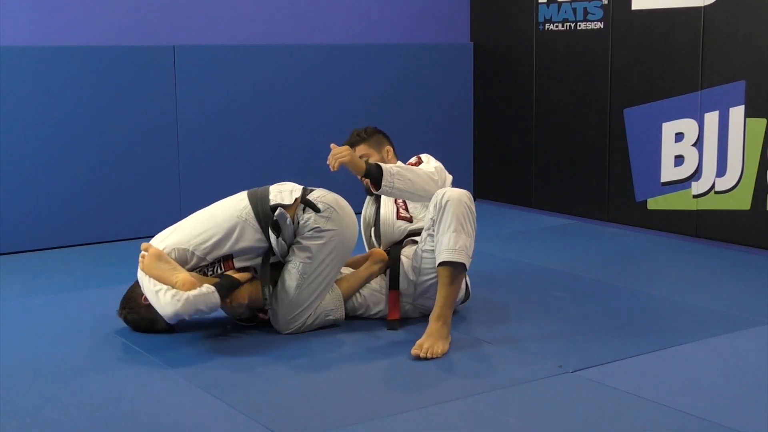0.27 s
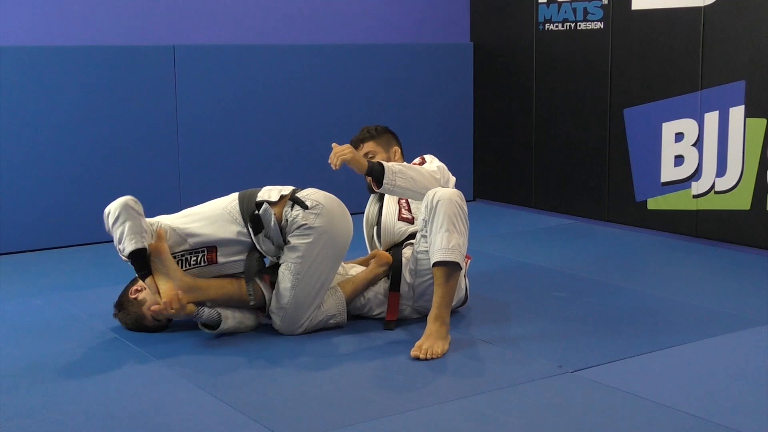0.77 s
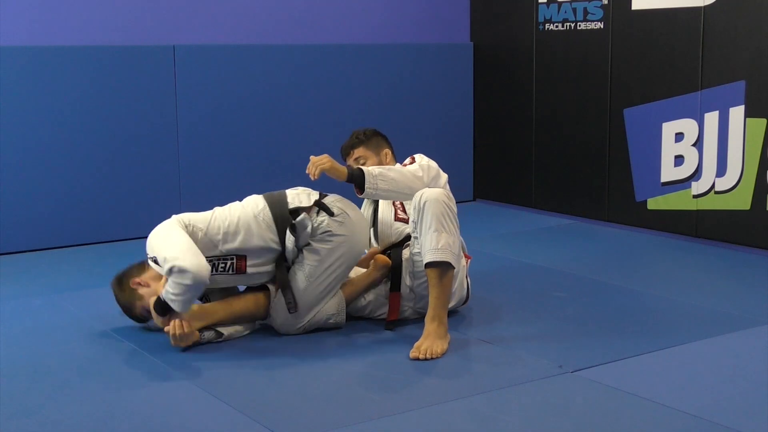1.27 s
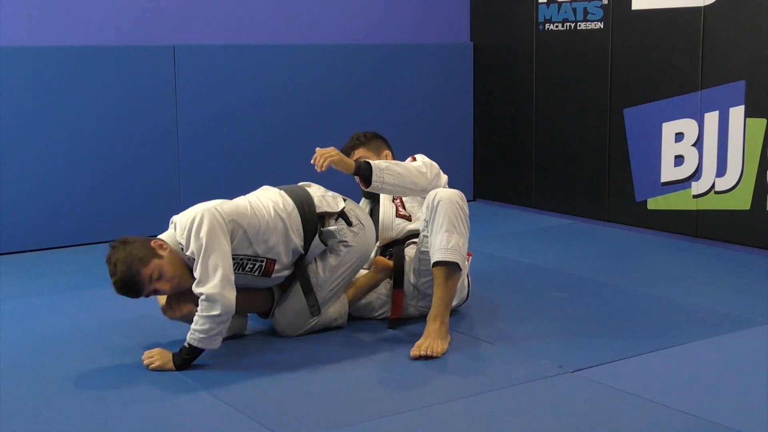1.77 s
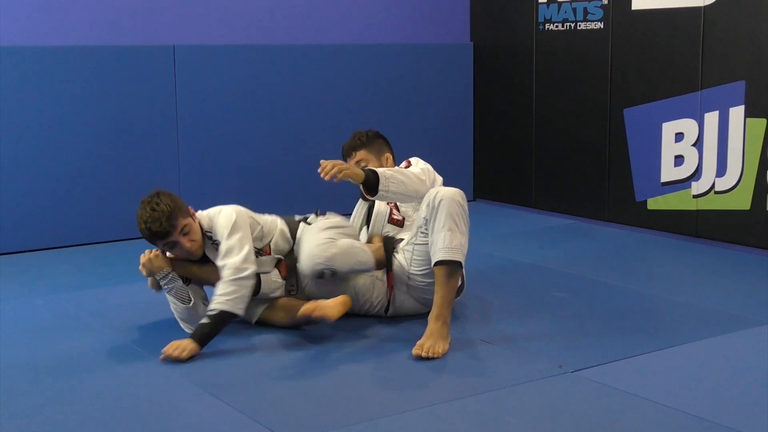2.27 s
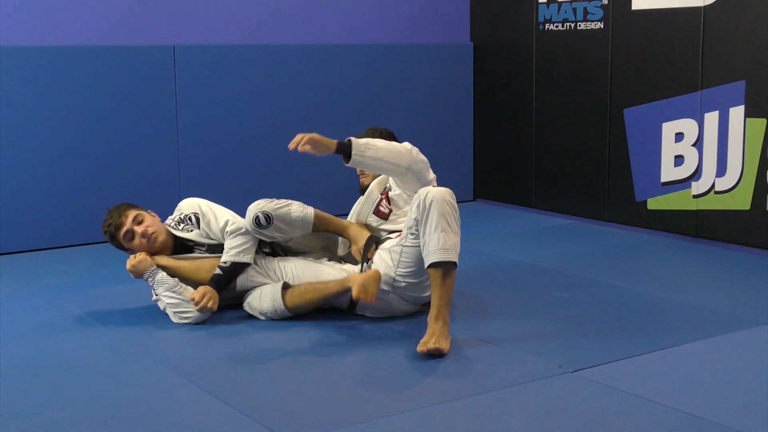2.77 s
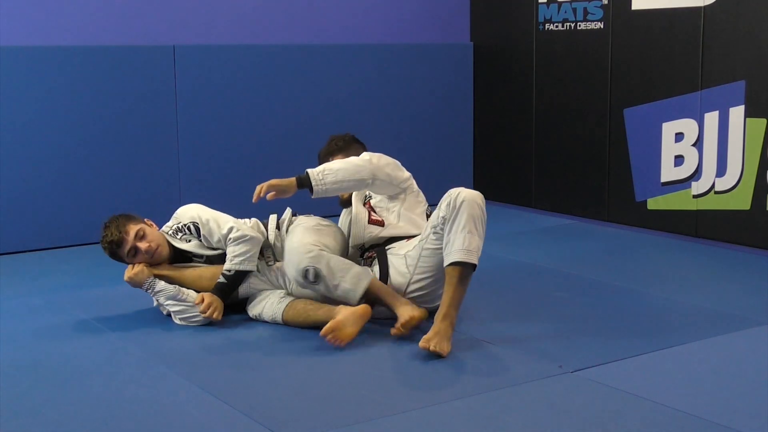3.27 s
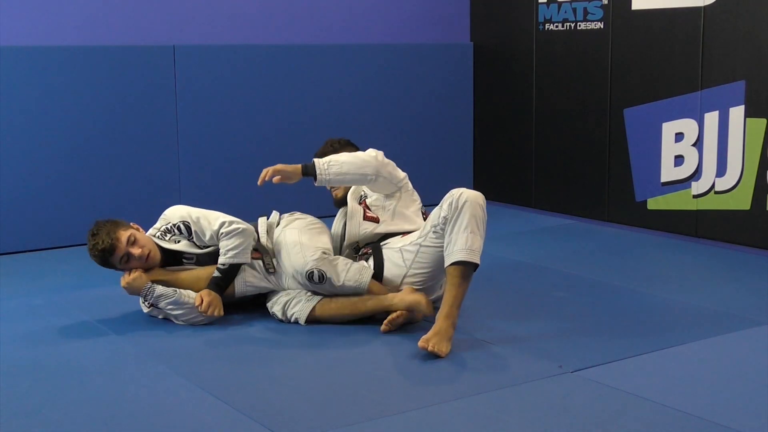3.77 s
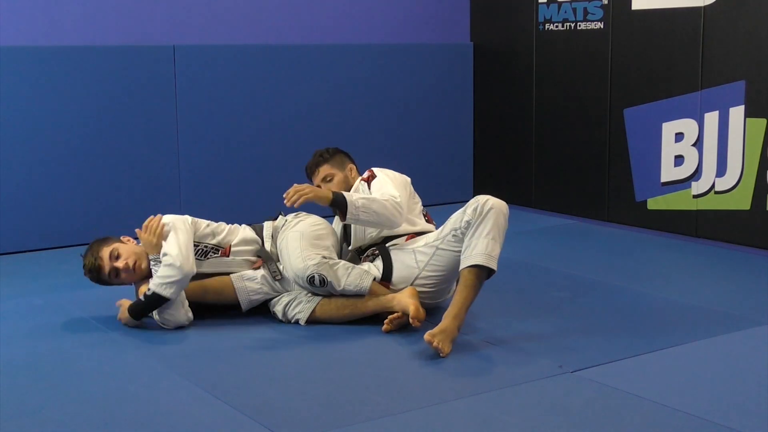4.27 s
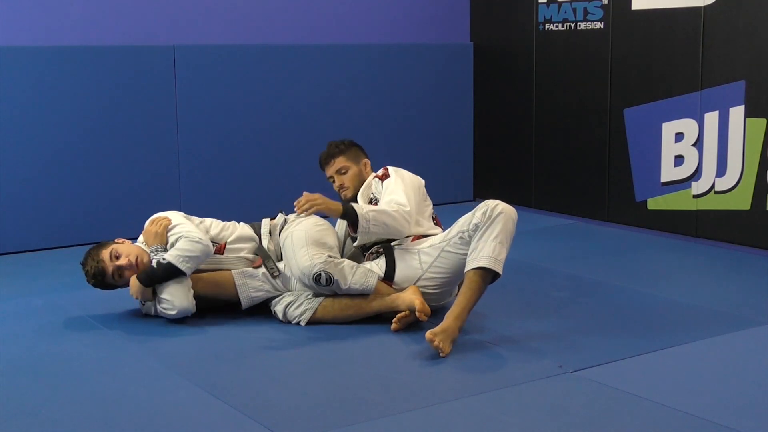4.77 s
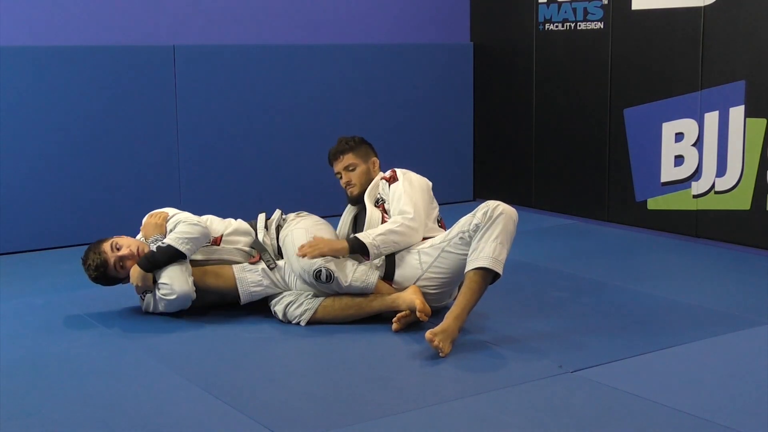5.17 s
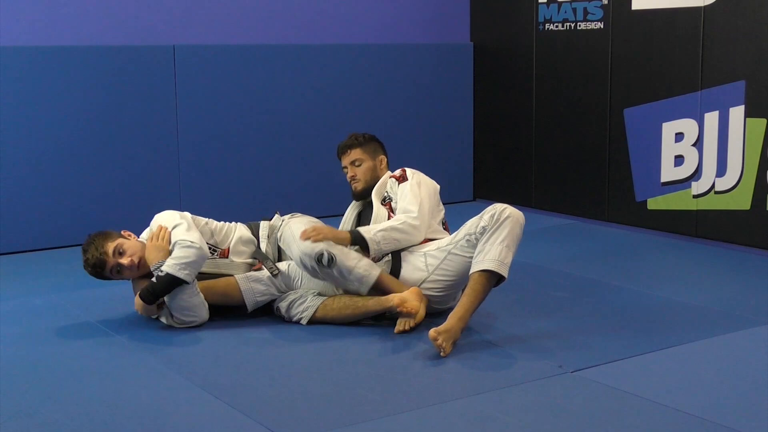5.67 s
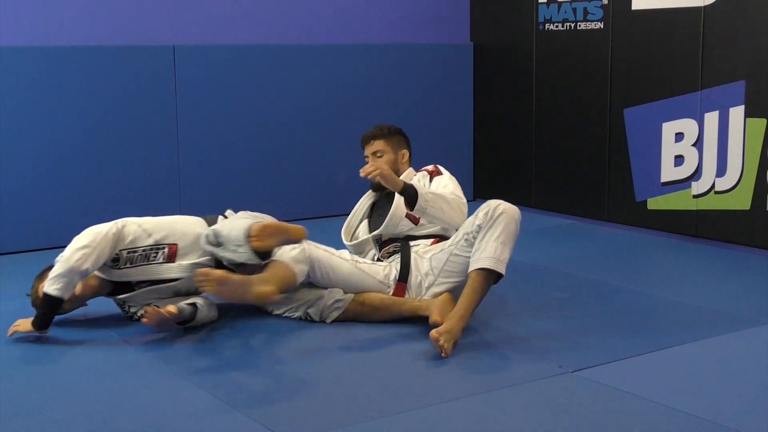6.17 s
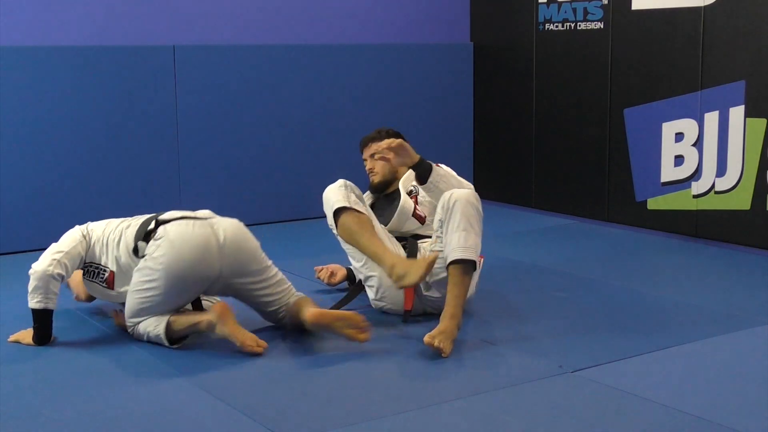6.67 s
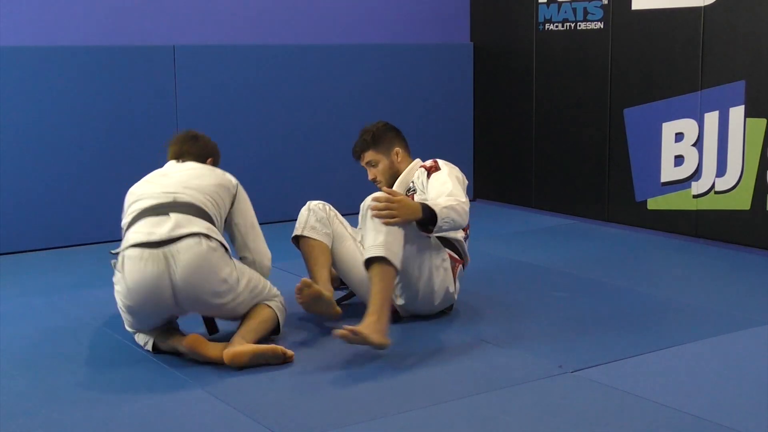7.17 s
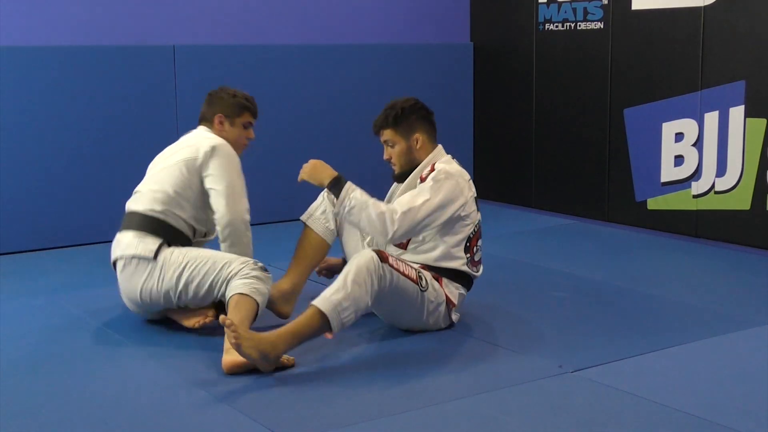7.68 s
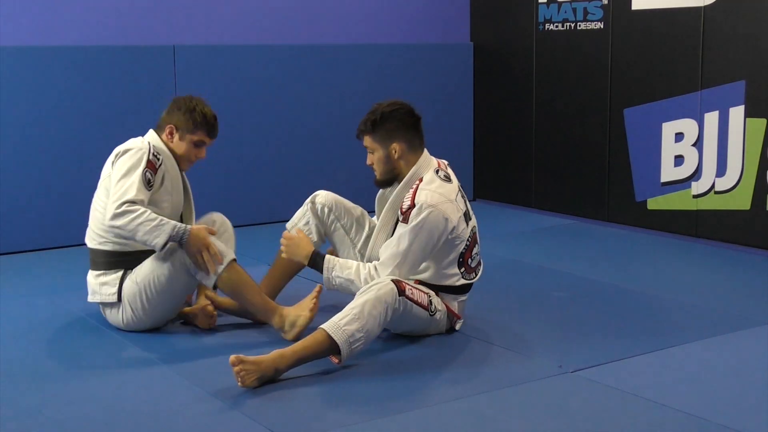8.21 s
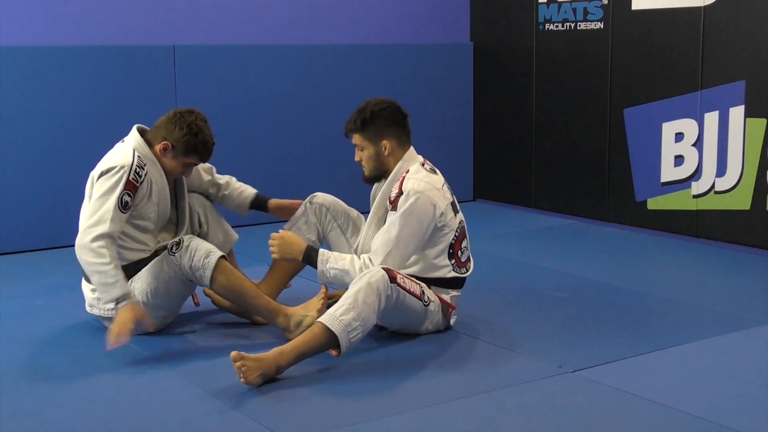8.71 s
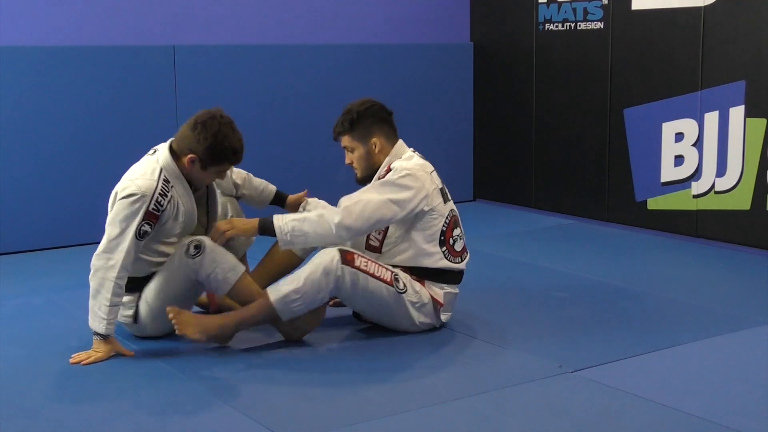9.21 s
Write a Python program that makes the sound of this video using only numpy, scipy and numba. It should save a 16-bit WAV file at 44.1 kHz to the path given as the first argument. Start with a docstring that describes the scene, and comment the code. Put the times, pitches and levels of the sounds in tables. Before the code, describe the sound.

Heavy cloth rustles and swishes as two people roll on a padded gym mat, with dull thuds of knees and limbs.

```python
"""Two people in heavy cotton suits roll on a foam mat in a padded gym, a few metres from a stereo mic.
Weave drags on weave, cloth and skin swish and squeak over the vinyl, weight shifts in the foam;
knees thud and a palm pats. The mat's echo hollows out the low middle; the room rings for
half a second over a faint ventilation hum."""
import sys
import numpy as np
from scipy import signal
from scipy.fft import rfft, irfft
from scipy.io import wavfile
from scipy.ndimage import uniform_filter1d
from numba import njit

SR = 44100
rng = np.random.default_rng(int(sys.argv[2]) if len(sys.argv) > 2 else 0)


def output_pcm(signal):
    """Save a mono or channel-first signal as 16-bit PCM at the path in sys.argv[1].

    Samples are clipped to [-1, 1] before scaling.
    """
    pcm = np.clip(np.atleast_2d(signal).T, -1, 1) * 32767
    wavfile.write(sys.argv[1], SR, np.round(pcm).astype(np.int16))


N = 416744
T = np.arange(N) / SR


def undb(db):
    return 10 ** (np.asarray(db) / 20)


def unit(x):
    """Scale to rms 1."""
    return x / np.sqrt(np.mean(x ** 2))


def colour(x, table, share=1, size=8192):
    """Minimum-phase filter through (Hz, dB) points; share scales the dB."""
    hz, db = np.transpose(table)
    bin_hz = np.arange(size // 2 + 1) * SR / size
    gain_db = share * np.interp(np.log(bin_hz + 1), np.log(hz + 1), db)
    cepstrum = irfft(gain_db * np.log(10) / 20)
    cepstrum[1:size // 2] *= 2
    cepstrum[size // 2 + 1:] = 0
    return signal.fftconvolve(x, irfft(np.exp(rfft(cepstrum))))[:len(x)]


@njit
def svf(x, hz, q):
    """State-variable band-pass with a moving centre, gain 1 there."""
    y = np.empty(len(x))
    mid, low, k = 0., 0., 1 / q
    for i in range(len(x)):
        g = np.tan(np.pi * hz[i] / SR)
        v = (mid + g * (x[i] - low)) / (1 + g * (g + k))
        mid, low = 2 * v - mid, low + 2 * g * v
        y[i] = k * v
    return y


def band(x, hz, q):
    return svf(x, np.full(len(x), float(hz)), float(q))


def walk(rate_hz):
    """Random levels held 1 / rate_hz seconds, smoothed twice."""
    hold = int(SR / rate_hz)
    steps = np.repeat(rng.standard_normal(N // hold + 1), hold)[:N]
    return uniform_filter1d(uniform_filter1d(steps, hold), hold)


def add(out, at_s, sound):
    i = int(at_s * SR)
    out[i:i + len(sound)] += sound[:len(out) - i]


def ventilation(hiss_db=-52.5):
    """Near-steady room hiss and a wavering low hum."""
    # Hiss spectrum. Each row: frequency in Hz, relative density in dB.
    hiss_shape = [(18, -37), (30, 1.5), (203, 3.5), (457, -15.5), (610, -12), (1110, -1), (1530, 3),
                  (5360, -9), (10300, -9), (15700, -13.5)]
    # Ventilation rumble. Each row: centre in Hz, width in Hz, level in dB.
    hum_bands = [(55.34, 6.9, -60.5), (124, 14.3, -60), (203, 19.3, -62)]
    hiss = unit(colour(rng.standard_normal(N), hiss_shape)) * undb(hiss_db + 1.1 * walk(3.46))
    hum = sum(undb(db) * unit(band(rng.standard_normal(N), hz, hz / width_hz))
              for hz, width_hz, db in hum_bands)
    return hiss + hum


def room_tail(gap_s=0.0066, rise_s=0.00897):
    """Diffuse response: noise bands dying at their own rates, energy 1."""
    # Room decay. Each row: frequency in Hz, T60 in seconds.
    decay_times = [(100, 0.573), (300, 0.512), (1000, 0.735), (3000, 0.591), (7000, 0.38), (14000, 0.435)]
    hz, t60_s = np.transpose(decay_times)
    tail, t = np.zeros(SR), T[:SR]
    for centre_hz in 40 * 2 ** np.arange(0, 9, .5):
        decay = undb(-60 * t / np.interp(np.log(centre_hz), np.log(hz), t60_s))
        tail += band(rng.standard_normal(SR), centre_hz, q=2.8) * decay
    tail *= np.clip((t - gap_s) / rise_s, 0, 1)
    return tail / np.sqrt(np.sum(tail ** 2))


def room(x, count=4, move_s=.12):
    """Diffuse sound; echo patterns crossfade in turn as the bodies move."""
    # Diffuse spectrum. Each row: frequency in Hz, gain in dB.
    room_eq = [(60, 0), (250, -7), (500, -3), (1500, -2.5), (15000, 0)]
    fades = (np.cos(np.pi * (T / move_s - k) / count) ** (2 * count) for k in range(count))
    diffuse = sum(signal.fftconvolve(x * np.sqrt(fade), room_tail())[:N] for fade in fades)
    return colour(diffuse, room_eq)


def wall_echoes(blows):
    """First reflections off the walls."""
    # Each row: delay in seconds, gain in dB.
    walls = [(.011, -7.5), (.024, -8), (.033, -15)]
    out = np.zeros(N)
    for delay_s, db in walls:
        add(out, delay_s, undb(db) * blows)
    return out


def skin_squeaks():
    """Ragged stick-slip on vinyl: a narrow gliding noise band under a rounded swell."""
    # Each row: start and length in seconds, first and last pitch in Hz, level in dB.
    catches = [(1.794, 0.043, 1780, 2500, -48.5), (2.932, 0.055, 1133, 1600, -43.5),
               (5.798, 0.053, 1995, 3210, -38.5), (6.188, 0.05, 2100, 1781, -43.5),
               (6.831, 0.034, 1303, 1594, -41), (9.362, 0.055, 1420, 1530, -42)]
    out = np.zeros(N)
    for start_s, length_s, from_hz, to_hz, db in catches:
        progress = np.arange(int(length_s * SR)) / (length_s * SR)
        hz = from_hz + (to_hz - from_hz) * progress
        noise = rng.standard_normal(SR // 8)[:len(progress)]
        chirp = svf(svf(noise, hz, q=5.3), hz, q=3.04)
        add(out, start_s, undb(db) * unit(chirp) * np.sin(np.pi * progress))
    return out


def palm_pats():
    """On a clothed back: a clap of trapped air scattered by the folds, and a dull knock of the ribs."""
    # Each row: start in seconds, relative level in dB, spread in seconds, knock gain in dB.
    pats = [(5.217, -12.5, 0.0011, -9.5), (5.4177, -12.5, 0.0011, -14.5)]
    # Cupped palm. Each row: frequency in Hz, gain in dB.
    palm_eq = [(100, -7), (270, 1), (350, -9), (460, 5.5), (760, -0.5), (1360, -1.5), (1900, -0.5),
               (2300, -0.5), (3400, -2), (11000, -16.5), (16000, -21)]
    out, t = np.zeros(N), T[:SR // 10]
    knock = np.sin(2 * np.pi * 400 * t) * np.exp(-t / 0.00396)
    for start_s, db, spread_s, knock_db in pats:
        clap = colour(signal.unit_impulse(len(t)), palm_eq)
        clap /= np.abs(clap).max()
        for lag in (spread_s * SR * rng.uniform(.3, 1.7, size=3)).astype(int) + 1:
            loop = np.zeros(lag + 1)
            loop[[0, -1]] = 1, .68
            clap = signal.lfilter(loop[::-1], loop, clap)  # all-pass
        add(out, start_s, undb(db + 8.5) * clap + undb(db + knock_db) * knock)
    return out


def limb_thuds(slab_hz=55, slab_t60_s=0.53):
    """Damped cycles of foam ring the mat and the floor slab; skin smacks the vinyl."""
    # Each row: start in seconds, level in dB, contact pitch in Hz, damping per cycle,
    # then ring, boom and smack gains in dB.
    landings = [(0.009, -32.5, 371, 1.9, -5.5, -25, -16.5), (0.452, -30, 361.9, 1.73, -2.5, -23.5, -16),
                (0.484, -28.5, 236, 1.3, -8, -25.5, -18.5), (1.623, -24, 253.8, 1.85, -7.5, -30, -15),
                (1.949, -37.5, 151, 2.04, -4, -25.5, -17), (2.014, -28.5, 431, 1.52, -2.5, -23, -16.5),
                (2.262, -19, 151, 2.53, 0, -25.5, -15.5), (2.271, -20, 177, 1.63, -13.5, -26, -17.5),
                (2.289, -13, 228.2, 1.71, -5, -19, -18), (2.307, -18.5, 238.5, 1.64, -6.5, -25.5, -14),
                (2.329, -27.5, 151, 2.1, -12.5, -27, -16.5), (2.376, -24, 271.4, 1.69, -5, -26, -19),
                (2.435, -25.5, 214, 2.1, -10, -31, -17), (3.075, -26.5, 462.6, 1.53, -7, -26.5, -19),
                (3.146, -22, 345.3, 1.76, -4, -26.5, -20.5), (3.382, -26.5, 355, 2.1, -5, -23.5, -16),
                (3.564, -37.5, 215.5, 1.6, -7.5, -25.5, -17), (3.786, -30, 378, 2.02, -7, -25, -17.5),
                (4.235, -35.5, 457, 1.59, -5.5, -21.5, -17.5), (6.295, -30.5, 300, 1.66, -9, -26, -16.5),
                (6.546, -9.5, 320, 1.93, -5, -28.5, -15.5), (6.557, -14, 178.8, 1.74, -6.5, -26.5, -17.5),
                (6.579, -14.5, 218.6, 1.62, -7, -29, -15), (6.789, -38, 160.7, 1.95, -5, -26, -16.5),
                (6.906, -39, 202, 2.07, -7.5, -28, -17), (7.24, -25, 197.5, 1.51, -10.5, -26.5, -19),
                (7.616, -37, 151, 2.03, -10, -26, -17), (7.775, -24.5, 350.4, 1.73, -10, -26, -17.5),
                (8.281, -36.5, 204, 1.81, -7.5, -22, -15.5), (8.999, -42, 151, 1.74, -1.5, -26, -17.5),
                (9.314, -35, 337, 1.9, -9, -23, -17), (9.387, -39.5, 164, 2.07, -5.5, -26, -17)]
    # Each row: mode frequency in Hz, gain in dB, T60 in seconds.
    mat_modes = [(106.4, -1.5, 0.19), (151, -4, 0.405), (192.6, -0.5, 0.243), (232.43, 2, 0.229),
                 (300, -11.5, 0.059), (355, -14, 0.096), (456.1, -8.5, 0.069)]
    out, t = np.zeros(N), T[:SR // 2]
    boom = np.sin(2 * np.pi * slab_hz * t) * (1 - np.exp(-t / 0.0227)) * undb(-60 * t / slab_t60_s)
    for start_s, db, hz, damping, ring_db, boom_db, smack_db in landings:
        u = damping * hz * t / 2
        give = (u * np.exp(1 - u)) ** 2  # foam yields gradually
        hit = (np.sin(2 * np.pi * hz * t) + 0.249 * np.sin(2 * np.pi * 1.797 * hz * t)) * give
        modes = np.zeros(len(t))
        for mode_hz, mode_db, t60_s in mat_modes:
            spot_db, detune = rng.normal(0, [2.695, 0.0288])  # each spot drives the modes its own way
            decay = undb(mode_db + spot_db - 60 * t / t60_s)
            modes += np.sin(2 * np.pi * mode_hz * (1 + detune) * t) * decay
        ring = signal.fftconvolve(hit[:SR // 10], modes)[:len(t)] * hz / SR
        smack = band(rng.standard_normal(len(t)), 2700, q=0.373) * np.exp(-t / 0.0058)
        thud = hit + undb(ring_db) * ring + undb(boom_db) * boom + undb(smack_db) * smack
        add(out, start_s, undb(db) * thud)
    return out


def fibre_slips(scatter_db, flicker_db, rate_hz):
    """Countless fibres catch and let go: uneven clicks in flurries."""
    clicks = rng.standard_normal(N) * undb(scatter_db * np.minimum(rng.exponential(size=N), 4))
    return clicks * undb(flicker_db * walk(rate_hz))


def rubbing():
    """Coarse weave rasps around a pitch set by its speed, smooth sliding hisses, foam rumbles."""
    # Two spells of rolling. Each row: time in seconds, drag in dB, drag centre in Hz, swish in dB,
    # weight shift in dB, foam pitch in Hz. Levels are relative.
    spells = [
        [(0.0, -40, 2400, -36, -47.5, 378), (0.1, -51.5, 2040, -47, -52, 267),
         (0.14, -49.5, 1610, -53.5, -49, 302), (0.32, -48.5, 1840, -48, -48.5, 243),
         (0.39, -43.5, 1860, -46.5, -51.5, 355), (0.42, -44.5, 1590, -46, -45, 344),
         (0.49, -44.5, 2200, -39, -41, 240.6), (0.56, -46.5, 1760, -48, -55, 216),
         (0.64, -43, 2120, -47, -42.5, 278), (0.68, -36, 2070, -51.5, -54, 302),
         (0.78, -51.5, 1790, -52, -53.5, 208), (0.94, -50.5, 1970, -51.5, -51, 276),
         (1.03, -56, 1820, -71, -58.5, 230), (1.08, -50, 1830, -54, -52, 348),
         (1.14, -58.5, 1880, -61, -54, 279), (1.21, -57, 1730, -58.5, -46, 355),
         (1.26, -48, 1480, -56, -51.5, 276), (1.36, -51.5, 1610, -61.5, -54, 264),
         (1.5, -50, 2400, -45.5, -59.5, 198.5), (1.6, -56.5, 2240, -50.5, -56, 278),
         (1.65, -44, 2578, -40.5, -40, 228.7), (1.69, -46.5, 1560, -51.5, -51, 223.7),
         (1.76, -51, 1620, -54.5, -47, 219), (1.84, -46.5, 2040, -43.5, -49.5, 235),
         (1.89, -49.5, 1629, -50, -48.5, 339.8), (1.94, -34.5, 2000, -47, -50, 226),
         (1.97, -37, 2360, -35, -44.5, 213), (2.01, -39.5, 2380, -37, -46.5, 340),
         (2.04, -39, 2040, -36.5, -39.5, 382), (2.08, -28, 2920, -42.5, -45.5, 321),
         (2.14, -37, 2830, -30.5, -39.5, 294), (2.18, -35.5, 3700, -19.5, -45, 296),
         (2.21, -40.5, 3727, -21, -38, 262.6), (2.24, -40.5, 2760, -38.5, -43, 212),
         (2.27, -26.5, 1978, -26, -23, 212), (2.3, -30.5, 1670, -28, -29.5, 220),
         (2.34, -35.5, 1940, -35, -29.5, 220), (2.39, -32, 1600, -34, -32.5, 258),
         (2.43, -42, 1509, -35.5, -41, 252.3), (2.47, -46, 1590, -36.5, -37, 306.2),
         (2.57, -40.5, 1674, -41, -38.5, 223), (2.63, -43, 1890, -41, -42, 286),
         (2.76, -47.5, 1690, -50.5, -55, 254), (2.86, -45, 1943, -48, -52, 261),
         (2.98, -45, 1447, -45.5, -51.5, 271.4), (3.05, -46, 1740, -53, -46.5, 412),
         (3.09, -41.5, 1632, -59, -57.5, 420), (3.18, -46, 1610, -49.5, -47.5, 284),
         (3.22, -46.5, 1813, -45.5, -53.5, 206.7), (3.28, -45, 1940, -46, -51, 319),
         (3.32, -49.5, 1940, -44.5, -54, 249), (3.37, -42, 1890, -42, -47.5, 336),
         (3.43, -40.5, 2210, -37, -42.5, 331.5), (3.53, -43, 2211, -37, -40, 366.4),
         (3.56, -43.5, 1900, -39, -41.5, 347), (3.73, -54.5, 1730, -56.5, -56.5, 234),
         (3.77, -49, 1820, -47.5, -51.5, 359), (4.05, -50.5, 1601, -58.5, -52, 188),
         (4.21, -45, 1820, -46.5, -47, 297), (4.24, -47, 2230, -44, -44, 306), (4.28, -43, 3500, -30, -49, 245),
         (4.34, -44.5, 2961, -34, -55.5, 262), (4.39, -50.5, 3320, -53.5, -51, 203),
         (4.54, -65.5, 1760, -68.5, -57.5, 223), (5.03, -79, 1630, -72, -56, 182),
         (5.19, -50.5, 1910, -74.5, -57, 197)],
        [(5.62, -52.5, 1910, -56, -55.5, 205), (5.65, -53, 1850, -53, -56.5, 202),
         (5.75, -42.5, 1960, -42, -51, 305), (5.82, -36.5, 2530, -52, -48, 271.5),
         (5.87, -47, 2630, -41.5, -47.5, 228), (5.95, -49.5, 2000, -43, -44, 365),
         (6.06, -42.5, 1930, -48.5, -48, 284), (6.11, -39.5, 1900, -32, -41.5, 365),
         (6.21, -41, 1890, -41.5, -48, 277), (6.26, -45.5, 1852, -47, -52, 247.5),
         (6.43, -45, 1900, -41.5, -48.5, 307), (6.54, -50.5, 1790, -50, -55.5, 278),
         (6.55, -35, 1860, -45, -45, 239), (6.61, -42, 1904, -34.5, -48, 212),
         (6.71, -45, 2660, -41, -56.5, 208), (6.77, -42.5, 1750, -45, -40, 241),
         (6.86, -41.5, 1480, -42.5, -41, 209), (6.95, -43, 1624, -44.5, -41.5, 315),
         (7.01, -38, 1508, -35.5, -43.5, 300), (7.05, -39.5, 1780, -45.5, -49, 211),
         (7.15, -46, 1660, -52, -56.5, 229), (7.23, -47.5, 1660, -48, -44, 198),
         (7.28, -44.5, 2040, -42.5, -48, 199.5), (7.41, -40, 1910, -42.5, -45.5, 238),
         (7.45, -43, 1810, -39, -46.5, 368), (7.5, -43.5, 1750, -38.5, -48, 296),
         (7.57, -46, 2180, -50, -52, 264), (7.64, -35.5, 2700, -29.5, -37.5, 258),
         (7.69, -37.5, 2310, -39.5, -47.5, 334), (7.77, -34.5, 2100, -46.5, -38.5, 342),
         (7.84, -32, 1839, -35, -33, 292), (7.92, -40, 2010, -39.5, -49.5, 226),
         (7.98, -39.5, 2210, -41.5, -47.5, 295), (8.04, -42.5, 2230, -37.5, -49, 251),
         (8.09, -45.5, 2600, -46, -52.5, 319), (8.17, -50, 1870, -51.5, -55.5, 208),
         (8.4, -40, 1770, -59, -47.5, 222), (8.46, -41.5, 2030, -32.5, -51.5, 277.8),
         (8.51, -42.5, 2300, -43.5, -54.5, 273), (8.7, -52, 1820, -52.5, -52.5, 193),
         (8.8, -46.5, 1460, -53, -49.5, 208), (8.85, -51, 1530, -51.5, -52, 188),
         (8.94, -42.5, 1950, -48.5, -48.5, 277), (8.99, -43.5, 1848, -41.5, -44, 198.3),
         (9.18, -44, 1810, -46.5, -53, 218), (9.28, -39, 2160, -58, -44, 353),
         (9.32, -37, 2430, -48.5, -43, 301), (9.37, -34.5, 1680, -44, -49, 252),
         (9.45, -36.5, 2210, -48, -37.5, 297)],
    ]
    time_s, *columns = np.concatenate(spells).T
    drag_db, drag_hz, swish_db, weight_db, foam_hz = (np.interp(T, time_s, c) for c in columns)
    # Sliding hiss. Each row: frequency in Hz, gain in dB.
    swish_eq = [(300, -35.5), (2200, -17.5), (4000, 0.5), (8000, -1), (12000, 0), (16000, -5)]
    rasp = fibre_slips(scatter_db=2.0, flicker_db=2.5, rate_hz=40)
    drag = unit(svf(rasp, drag_hz, q=0.797)) + 0.461 * unit(band(rasp, 1430, q=0.437))
    slide = fibre_slips(scatter_db=0.17, flicker_db=2.5, rate_hz=50)
    swish = unit(colour(slide, swish_eq))
    foam = fibre_slips(scatter_db=3.5, flicker_db=5.0, rate_hz=30)
    rumble = band(band(foam, 303, q=0.834), 283, q=0.215)
    weight = unit(svf(foam, foam_hz, q=1.04)) + 0.5176 * unit(rumble)
    return drag * undb(drag_db - 4.5) + swish * undb(swish_db - 4) + weight * undb(weight_db - 2.5)


def scene(room_db=-3.6475):
    """Bodies in the centre; only diffuse sound and ventilation have width."""
    # Direct path plus the mat's echo, as the mic colours it. Each row: frequency in Hz, gain in dB.
    path_eq = [(30, -6.5), (100, -0.5), (440, -1), (580, -8.5), (870, -7), (1150, 2), (5000, -1.5),
               (11000, 2), (15700, -3.5)]
    # Diffuse width. Each row: frequency in Hz, side gain in dB.
    side_eq = [(60, -12.5), (250, -10), (700, -12.5), (2400, -11), (4400, -8), (8000, -27.5), (15000, -3.5)]
    blows = limb_thuds() + palm_pats()
    near = colour(rubbing() + skin_squeaks() + blows, path_eq)
    echoes = colour(wall_echoes(blows), path_eq)
    mid = near + echoes + undb(room_db) * room(near) + ventilation()
    side = colour(undb(0.5) * room(near) + undb(5.5) * ventilation(), side_eq)
    return np.array([mid + side, mid - side])


def record(dry):
    """Two slightly unequal capsules, then a steep low-pass."""
    # Capsule mismatch. Each row: frequency in Hz, left minus right in dB.
    mismatch = [(60, 1), (110, 2), (200, 1.0), (380, 0), (700, 0), (1290, -1.0), (2380, -1.0), (4400, -0.5),
                (8120, -0.5), (15000, 1.5)]
    top_hz = 15750
    pair = [colour(dry[0], mismatch, share=.5), colour(dry[1], mismatch, share=-.5)]
    return signal.sosfilt(signal.ellip(12, .2, 80, top_hz, fs=SR, output="sos"), pair)


dry = scene()
out = record(dry)
output_pcm(out)
```